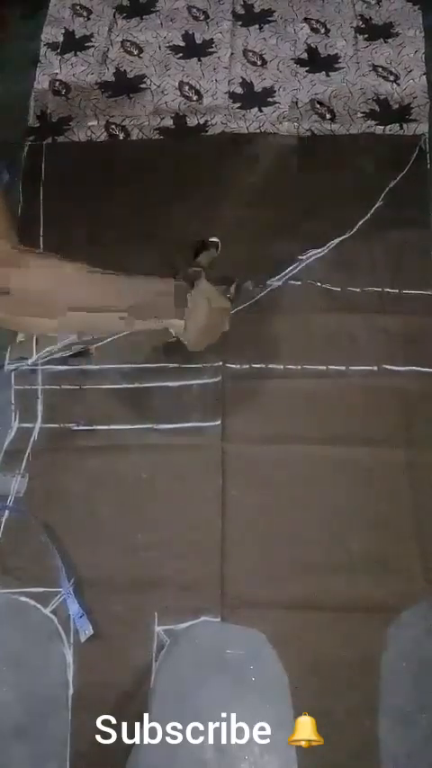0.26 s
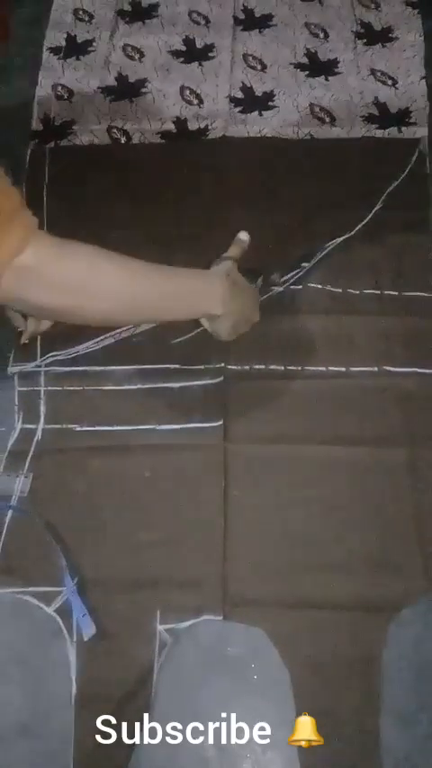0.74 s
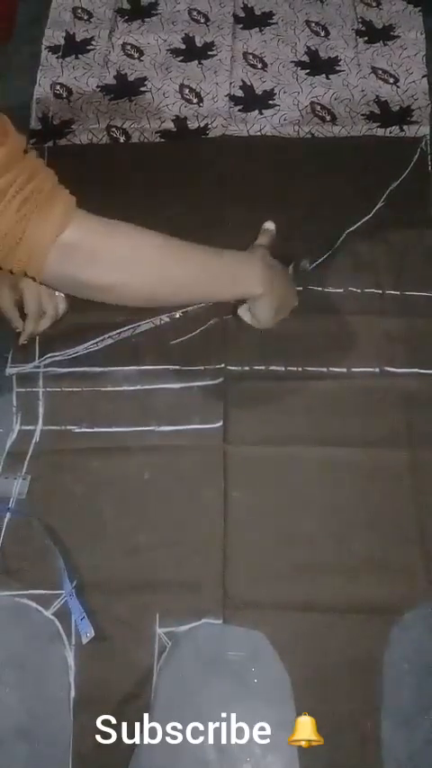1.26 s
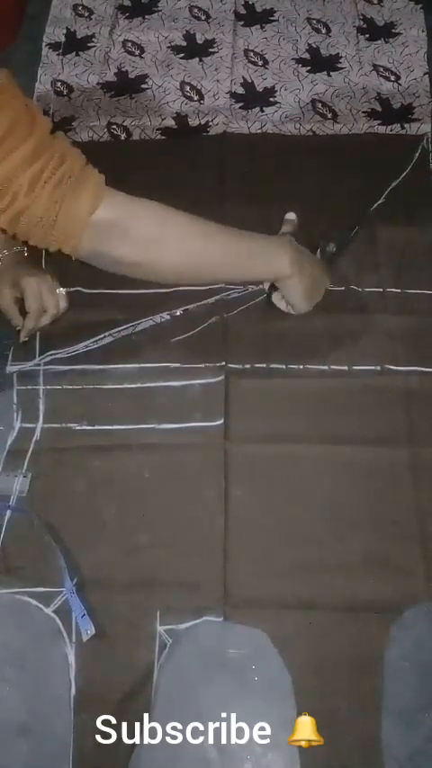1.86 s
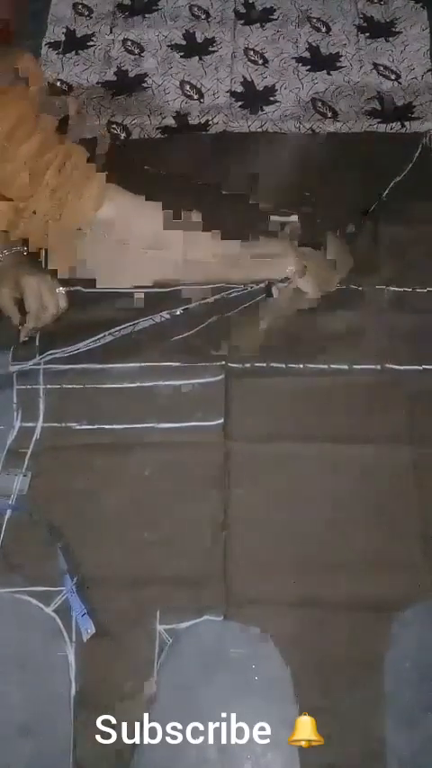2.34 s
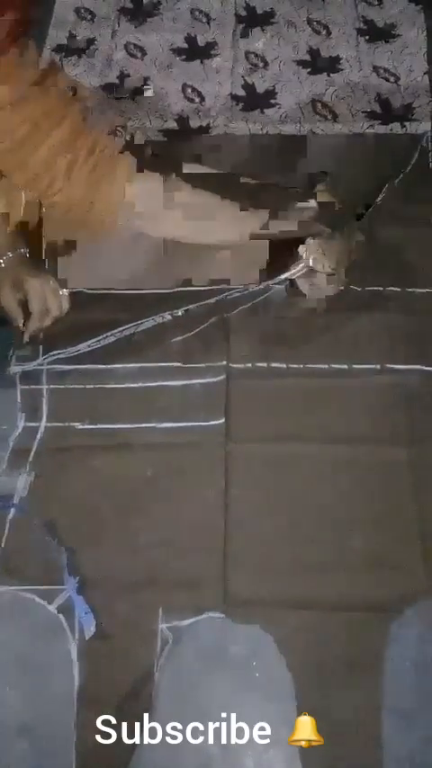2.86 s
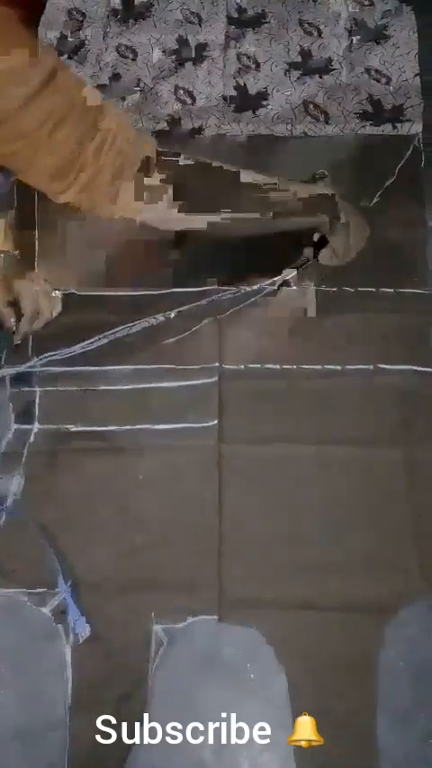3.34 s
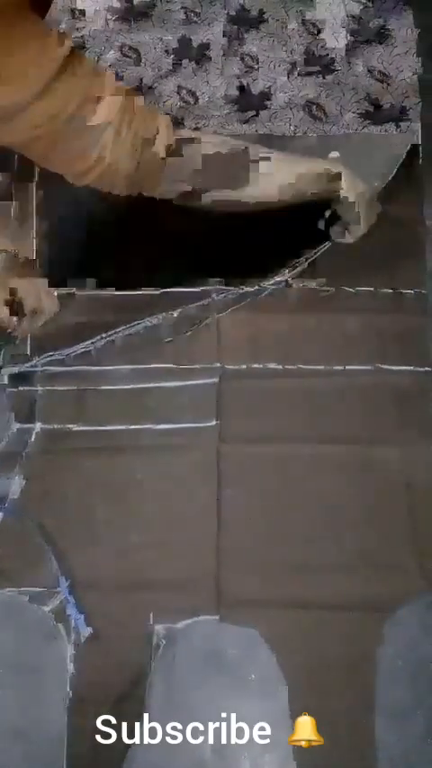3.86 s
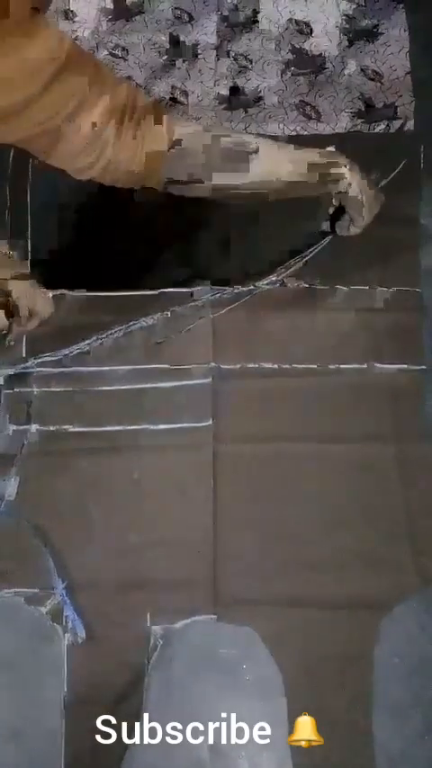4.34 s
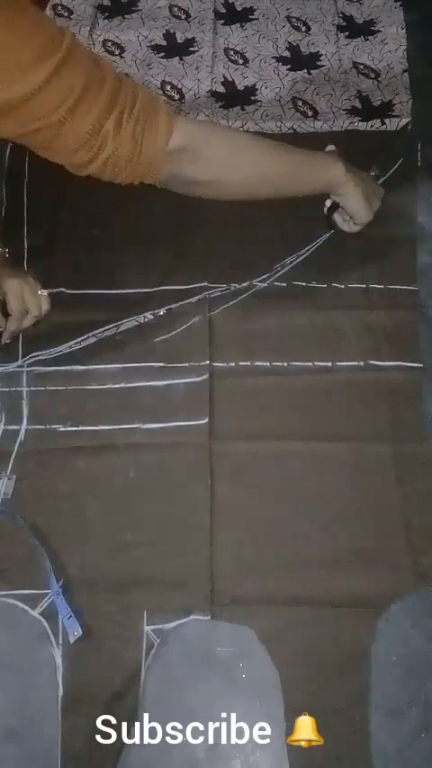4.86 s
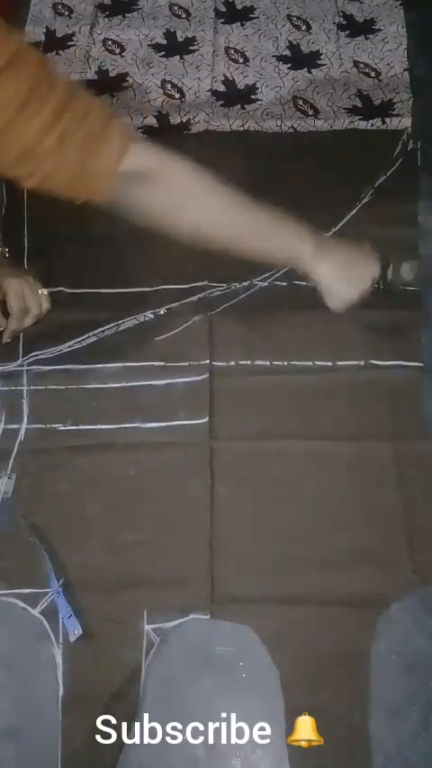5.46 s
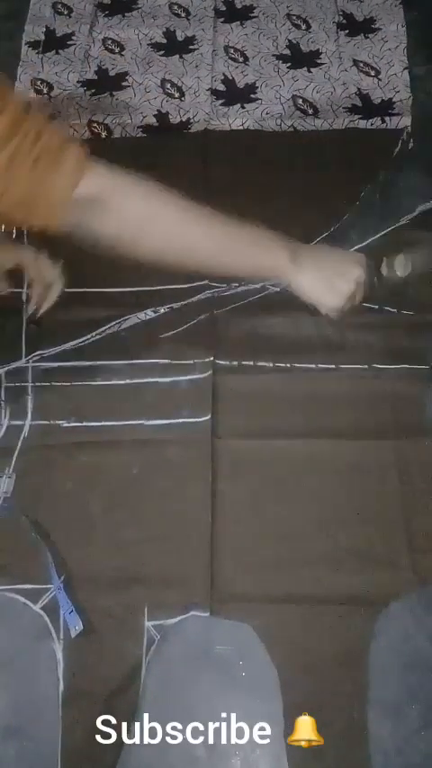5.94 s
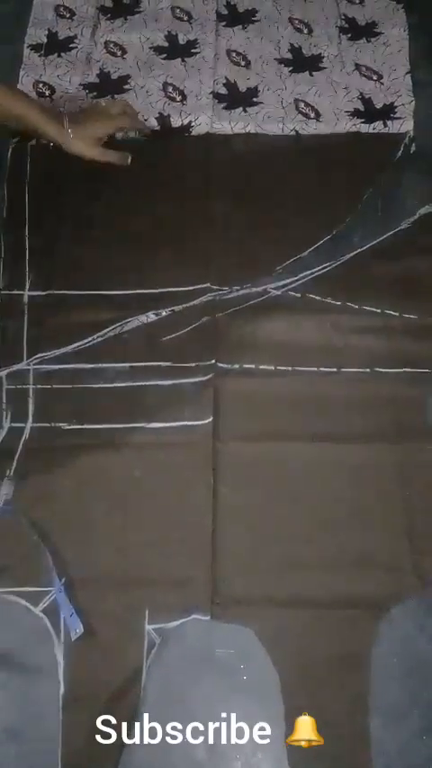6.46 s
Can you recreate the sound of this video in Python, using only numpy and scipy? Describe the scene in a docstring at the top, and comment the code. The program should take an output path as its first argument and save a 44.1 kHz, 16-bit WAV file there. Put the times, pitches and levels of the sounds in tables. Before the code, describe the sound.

Close, steady scissor strokes crunch fabric about twice a second, steel scraping between cuts, then the blades clack shut hard and brush away.

```python
"""A small room, close to the shears: a tailor cuts a curve through cloth spread on the floor, two cuts a second.
Closing, the edges crunch through threads and the lower blade drums on the floor; opening, steel rasps on steel.
These are grains of friction noise through moving resonances; ticks and the final clack are struck modes.
At the end the shears snap shut loudly and are drawn away over the cloth; air and a faint hum lie behind."""
import sys
import numpy as np
from scipy import signal
from scipy.fft import rfft, irfft, next_fast_len
from scipy.io import wavfile
from scipy.ndimage import map_coordinates

SR = 44100
rng = np.random.default_rng(int(sys.argv[2]) if len(sys.argv) > 2 else 0)


def generate_wav(signal):
    """Clip the signal to [-1, 1] and save it as 16-bit WAV at the path in sys.argv[1]."""
    frames = np.transpose(np.atleast_2d(signal))
    scaled = np.clip(frames, -1, 1) * 32767
    pcm = np.round(scaled).astype(np.int16)
    wavfile.write(sys.argv[1], SR, pcm)


N = 295026
TIME = np.arange(N) / SR

# Levels in the tables are those of each layer before the final mix.
# Closing strokes: (start [s], length [s], swell of the hiss [dB], edge hiss [dB], thread crunch [dB],
#                   floor drumming [dB], taut cloth resonance [Hz])
CLOSING_STROKES = [ (-0.1, 0.11, 5, -45, -62.5, -51, 1440), (0.349, 0.18, 12.5, -40, -56, -54.5, 1780),
                   (0.888, 0.12, 14, -40, -57.5, -51.5, 1480), (1.359, 0.11, 18, -39.5, -45.5, -47, 1380),
                   (1.926, 0.12, 18, -41, -46, -49.5, 880), (2.41, .2, 14, -41, -44.5, -48.5, 1050),
                   (2.951, 0.2, 13.5, -40.5, -46, -47, 1100), (3.545, 0.1, 14, -39, -42, -42.5, 1030),
                   (4.018, .14, 16.5, -39, -46.5, -50.5, 1490), (4.843, 0.07, 27, -54.5, -55.5, -73, 1660),
                   (5.06, 0.15, 17, -39.5, -44, -50.5, 1674), (5.854, .075, 17, -46.5, -53, -61.5, 1760), ]
# Colour of the cutting edges: (frequency [Hz], level [dB])
CUTTING_EDGE_COLOUR = [(2500, -24), (3700, -9.5), (4500, 1), (5600, 1), (7000, -2), (8050, -1.5),
                       (8600, -13), (9500, 1), (11300, -2.5), (12500, -5.5), (15500, -11.5)]
# Colour of the severed threads: (frequency [Hz], level [dB])
THREAD_COLOUR = [(350, -37), (740, -13), (970, 4), (1200, -0.5), (1550, 4.5), (2100, -2.5), (2450, -2.5),
                 (3000, 0.5), (3700, -14), (5000, -32)]
# Colour of the floor under the blade, also heard in the opening strokes: (frequency [Hz], level [dB])
FLOOR_COLOUR = [(60, -23), (150, -14), (300, -5.5), (370, -1.5), (440, 5.5), (490, -1), (545, 7.5),
                (620, -3), (750, -10.5), (1300, -51.5)]
CUT_ATTACK_S, CUT_RELEASE_DB_PER_S = 0.006, 480
CRUNCH_SWELL_DB, DRUM_SWELL_DB = 21.5, 24  # cloth and floor join in as the grip tightens
EDGE_EASE, CRUNCH_EASE, DRUM_EASE = 1.4, 1.5, 3.1  # higher = reaches full strength sooner
FLOOR_NEAR_HZ, FLOOR_FAR_HZ = 428, 570  # the floor under the blade rings higher further along


def cutting():
    """Closing: the grip tightens until the blades meet; severed threads excite the edges, cloth and floor."""
    start, length, swell_db, edge_db, crunch_db, drum_db, cloth_hz = latest(CLOSING_STROKES)
    gap = 1 - progress(start, length)
    threads = grains(rate=2200, spread_db=2.4, smooth=0.8, clump_db=1.1)

    hiss = coloured(threads, CUTTING_EDGE_COLOUR)
    hiss = shifting(hiss, depth_db=4.5, width_hz=200, life=0.07)
    crunch = coloured(threads, THREAD_COLOUR)
    crunch = shifting(crunch, depth_db=3, width_hz=150, life=0.1, size=1024)
    crunch = gliding(crunch, cloth_hz, octaves=0.181, lift_db=7.5)
    floor_hz = with_reach(FLOOR_NEAR_HZ, FLOOR_FAR_HZ)
    drum = gliding(coloured(threads, FLOOR_COLOUR), floor_hz, octaves=0.15, lift_db=10.5)

    edge_gain = amp(edge_db - swell_db * gap ** EDGE_EASE)
    crunch_gain = amp(crunch_db - CRUNCH_SWELL_DB * gap ** CRUNCH_EASE)
    drum_gain = amp(drum_db - DRUM_SWELL_DB * gap ** DRUM_EASE)
    moving = stroke(start, length, CUT_ATTACK_S, CUT_RELEASE_DB_PER_S)
    return moving * (edge_gain * hiss + crunch_gain * crunch + drum_gain * drum)


# Opening and idle strokes: (start [s], length [s], attack [s], first scrape [dB], edge hiss [dB], rasp [dB],
#   growth of rasp and drumming [dB], rasp start [Hz], rasp end [Hz], floor drumming [dB])
OPENING_STROKES = [ (0.124, 0.18, 0.031, -48, -48, -60.5, 15.5, 2354, 2300, -64),
                   (0.64, .15, 0.032, -37, -51, -54, 4, 2430, 2110, -62),
                   (1.12, 0.18, 0.031, -37, -53, -57.5, -11.5, 2626, 2200, -62.5),
                   (1.568, 0.28, 0.031, -43, -55, -51, 10, 2200, 1750, -68),
                   (2.13, 0.26, 0.049, -43.5, -52, -44, -2, 2120, 2170, -66.5),
                   (2.695, 0.17, .056, -38.5, -49, -37, -3.5, 2200, 2050, -55),
                   (3.254, 0.2, 0.029, -47, -49, -41, -1, 2394, 2140, -56.5),
                   (3.748, .175, 0.028, -42, -47.5, -44.5, 4, 1798, 1980, -57.5),
                   (4.24, 0.064, .028, -39.5, -46.5, -43, 12, 1800, 2170, -56),
                   (4.398, .062, 0.044, -60, -41, -43, 4, 1850, 1933, -77),
                   (4.632, 0.15, 0.033, -66, -70, -64, -14, 2108, 1950, -83),
                   (5.3, 0.066, 0.063, -53, -51.5, -51, 33, 2590, 2920, -63.5), ]
# Colour of the sliding edges: (frequency [Hz], level [dB])
SLIDING_EDGE_COLOUR = [(2000, -24), (3500, -0.5), (4500, 2.5), (5500, 7), (6500, 4.5), (7900, 0.5),
                       (8550, -7.5), (9200, 0.5), (10400, -0.5), (12500, -6), (15500, -22)]
# Colour of the rasp of steel on steel: (frequency [Hz], level [dB])
RASP_COLOUR = [(400, -24.5), (750, -11.5), (950, -5), (1150, -5), (1500, 1.5), (2250, -4.5), (2700, -2),
               (4000, -18), (6000, -43)]
SLIDE_RELEASE_DB_PER_S = 128.5
SLIDE_BRAKE_DB = 23.5  # the release gains this much per stroke length: quick strokes stop sooner
SCRAPE_SHARPNESS = 5.4  # the blades break free with a short bright scrape
HISS_GROWTH_DB = 0.5
SHEEN_NEAR_DB, SHEEN_FAR_DB = 2, -7.5  # top treble of the sliding steel


def sliding():
    """Opening: a bright scrape, then steel sticks and slips; the rasp glides as the crossing point moves."""
    (start, length, attack, scrape_db, edge_db, rasp_db,
     growth_db, start_hz, end_hz, drum_db) = latest(OPENING_STROKES)
    age, done = np.maximum(TIME - start, 0), progress(start, length)
    moving = stroke(start, length, attack, SLIDE_RELEASE_DB_PER_S + SLIDE_BRAKE_DB / length)
    slips = grains(rate=1700, spread_db=2.2, smooth=0.8, clump_db=1.2)

    hiss = coloured(slips, SLIDING_EDGE_COLOUR)
    hiss = shifting(hiss, depth_db=4.5, width_hz=180, life=0.06)
    sheen = amp(with_reach(SHEEN_NEAR_DB, SHEEN_FAR_DB))
    hiss = hiss + (sheen - 1) * filtered(hiss, lambda hz: hz > 8500)  # duller as the arm reaches away
    hiss_hz = falling(age, start_hz=5180, end_hz=2300, time=0.099)
    hiss = gliding(hiss, hiss_hz, octaves=0.36, lift_db=6)

    rasp = coloured(slips, RASP_COLOUR)
    rasp = shifting(rasp, depth_db=6.0, width_hz=110, life=0.085, size=1024)
    rasp = gliding(rasp, start_hz + (end_hz - start_hz) * done, octaves=0.11, lift_db=10.5)
    floor_hz = with_reach(FLOOR_NEAR_HZ, FLOOR_FAR_HZ)
    drum = gliding(coloured(slips, FLOOR_COLOUR), floor_hz, octaves=0.2, lift_db=12.0)

    scrape_shape = age / attack * np.exp(1 - age / attack)  # peaks at 1 after the attack time
    scrape_gain = amp(scrape_db) * scrape_shape ** SCRAPE_SHARPNESS
    hiss_gain = np.hypot(scrape_gain, moving * amp(edge_db + HISS_GROWTH_DB * (done + 1.5)))
    growth = amp(growth_db * (done - 0.5))
    return hiss_gain * hiss + moving * growth * (amp(rasp_db) * rasp + amp(drum_db) * drum)


def falling(age, start_hz, end_hz, time):
    """A centre frequency that drops along a bell curve as the blades part."""
    return end_hz + (start_hz - end_hz) * np.exp(-(age / time) ** 2)


# Hard-pressed blades sing: (start [s], length [s], level [dB], growth [dB])
SINGING_MOMENTS = [(3.275, 0.0062, -31.5, 1.5), (3.579, 0.059, -45, 1.5), (3.771, 0.01, -39.5, -6),
                   (4.045, 0.096, -42, 3.5), (4.249, .022, -39.5, 3.5), (4.85, 0.016, -49, 1),
                   (4.88, .026, -44.5, 9), (5.058, 0.11, -39, 6)]
# Colour of the strongest blade resonance: (frequency [Hz], level [dB])
SONG_COLOUR = [(4300, -26), (5100, -17.5), (5450, 7), (5750, 0), (6100, -9), (7000, -27)]
SONG_ATTACK_S, SONG_RELEASE_DB_PER_S = 0.011, 485


def singing():
    """Where the edges press hard on each other, friction feeds one narrow resonance."""
    start, length, db, growth_db = latest(SINGING_MOMENTS)
    moving = stroke(start, length, SONG_ATTACK_S, SONG_RELEASE_DB_PER_S)
    pressure = moving * amp(db + growth_db * (progress(start, length) - 1.5))
    friction = grains(rate=1300, spread_db=0.5, smooth=0.9, clump_db=2)
    return pressure * coloured(friction, SONG_COLOUR)


# The shears snap shut and chatter: (time [s], level [dB])
SNAP_BLOWS = [(5.4869, -0.5), (5.4906, -14), (5.4938, -18)]
# The whole shears, damped by the hand, also heard in the ticks: (frequency [Hz], level [dB], t60 [s])
FRAME_MODES = [(1340, -23.5, 0.014), (1690, -7, 0.0072), (2630, -3, 0.015), (2760, -8, .018),
               (3040, -4, 0.012), (4010, -22, 0.017), (4414, 1, 0.011), (4320, -15, 0.025),
               (6530, -16, 0.0073), (11700, -24.5, .022)]
# Colour of the clack sent to the walls, also of the dull part of a tick: (frequency [Hz], level [dB])
CLACK_COLOUR = [(120, -47.5), (200, -20), (263, -8.5), (371, -11), (1000, -14.5), (1300, -4.5), (1750, -2),
                (2300, -1.5), (3000, -1.5), (4300, -1), (5200, -4.5), (6300, -11.5), (9500, -10.5),
                (12000, -14), (15500, -28)]


def snap():
    """The handles slam and chatter: direct clack, the broader burst sent to the walls, and its spread."""
    direct, blows, spread = np.zeros((3, N))
    spread_colour = [(4200, -53.0), (4800, 3.5), (7000, 1), (15000, -21.5)]
    for s, db in SNAP_BLOWS:
        blow = ring(FRAME_MODES, scatter_db=0.5, detune=0)
        add(direct, s, amp(db) * (blow + 0.07 * crack(t60=0.025)))
        add(blows, s, amp([db + 13]))  # a single-sample impulse
        add(spread, s, amp(db - 12.5) * crack(t60=0.012, spectrum=spread_colour))
    radiated = filtered(blows, lambda hz: amp(along(CLACK_COLOUR, hz)))
    thin = signal.butter(2, 700, "high", fs=SR, output="sos")  # slim steel radiates little bass
    direct, radiated = signal.sosfilt(thin, direct), signal.sosfilt(thin, radiated)
    return direct, radiated, filtered(spread, lambda hz: hz > 4200)


# The blades catch and tick: (time [s], strike level [dB], share of the dull clack [dB])
TICK_STRIKES = [(0.1431, -35, -17), (0.3002, -32, -17), (0.6749, -25, -17), (1.1544, -25, -16),
                (1.3533, -37, -21), (1.5808, -32, -13), (1.8392, -22.5, -22), (2.2892, -33, -4),
                (2.3346, -29, -15), (2.354, -22, -17), (2.3684, -27, -11), (2.7696, -20, -10),
                (2.8524, -29, -7), (2.9756, -29, -17), (3.2784, -26, -10), (3.7728, -28, -13),
                (4.2562, -27, -13), (4.4099, -33, -5), (4.4453, -25, -7), (4.7575, -44, -15),
                (4.8329, -44, -17), (4.8574, -44, -12), (5.0654, -38, -20), (5.1916, -15, -4),
                (5.3622, -24, -8), (5.3684, -24, -8), (5.3724, -25, -8), (5.3804, -28, -13),
                (6.5345, -32, -14), (6.6563, -45, -20)]
# Ring of the blades: (frequency [Hz], level [dB], t60 [s])
BLADE_MODES = [(4300, 2.5, 0.02), (4425, -2, .03), (5505, 4.5, 0.038), (6900, -6, 0.004),
               (6730, 15, 0.0041), (8430, 0, 0.046), (8900, -16.5, .03), (11600, -10.5, 0.015),
               (11900, -11.5, 0.12), (12300, -17, .04)]


def ticks():
    """The blades catch: a gritty, bright ring over a duller knock of the whole shears."""
    out = np.zeros(N)
    for s, db, clack_db in TICK_STRIKES:
        share = min(amp(clack_db), 1)
        bright = 0.5 * ring(BLADE_MODES, scatter_db=2.5, detune=0.02) + 0.28 * crack(t60=0.02)
        dull = 0.5 * ring(FRAME_MODES, scatter_db=6.0, detune=0.11)
        dull = dull + 0.22 * crack(t60=0.016, spectrum=CLACK_COLOUR)
        bite = 1 - np.exp(-np.arange(len(dull)) / SR / 0.001)  # the edges dig in over a millisecond
        strike = np.sqrt(1 - share ** 2 / 2) * bright + share * dull
        add(out, s - 0.0005, amp(db + 3.5) * bite * strike)
    return out


# Soft bumps on the floor: (time [s], level [dB], pitch [Hz])
FLOOR_BUMPS = [(2.595, -52, 70), (2.854, -43.5, 467), (4.476, -59.5, 485), (5.794, -53, 753),
               (5.817, -50, 220), (5.878, -53.5, 693), (6.539, -54, 75)]


def bumps():
    """Padded knocks of hand and shears on the floor: decaying noise banded around a pitch."""
    out = np.zeros(N)
    for s, db, hz in FLOOR_BUMPS:
        colour = [(hz / 4, -25), (hz / 2.06, 0), (hz * 1.3, 0), (hz * 3, -30), (hz * 10, -70)]
        add(out, s, amp(db - 0.5) * crack(t60=0.17, spectrum=colour))
    return out


# The arm drags over the cloth: (middle [s], half length [s], level [dB])
ARM_DRAGS = [(2.57, 0.087, -62), (3.12, 0.4, -58.5)]
# Colour of the sleeve on the cloth: (frequency [Hz], level [dB])
SLEEVE_COLOUR = [(60, -17), (150, -2.5), (250, -8), (340, 2), (450, -27), (900, -27.5)]
# The shears sweep away over the cloth: (middle [s], half length [s], level [dB])
SHEAR_SWEEPS = [(6.46, 0.15, -64)]
# Colour of the shears on the cloth: (frequency [Hz], level [dB])
CLOTH_COLOUR = [(290, -47.5), (500, -25), (674, 0.5), (949, -22), (1880, -10), (3880, -6), (5700, -5),
                (6030, -16), (15000, -39)]


def brushing():
    """Friction noise swells as the arm drags over the cloth and, at the end, the shears sweep across it."""
    out = 0
    for rows, colour in (ARM_DRAGS, SLEEVE_COLOUR), (SHEAR_SWEEPS, CLOTH_COLOUR):
        level = sum(amp(db) * swell(middle, half_length) for middle, half_length, db in rows)
        out = out + level * coloured(rng.standard_normal(N), colour)
    return out


# The room's decay: (frequency [Hz], t60 [s])
ROOM_DECAY = [(200, .3), (1500, .255), (4500, .25), (9000, .215), (15000, .17)]


def room(x, build):
    """Dense wall echoes that build up and die, the treble first."""
    hz, t, z = signal.stft(rng.standard_normal(SR // 2), SR, nperseg=256)
    decay = amp(-60 * t / along(ROOM_DECAY, hz)[:, None])
    onset = 1 - np.exp(-(t / build) ** 2)
    tail = signal.istft(z * decay * onset, SR, nperseg=256)[1]
    return signal.fftconvolve(x, tail / np.linalg.norm(tail))[:N]


# A faint hum swells and fades:
# (centre frequency [Hz], steady level [dB], middle of the swell [s], half length [s], swell level [dB])
HUM_TONES = [(105.5, -78, .9, 0.88, -63), (417, -83, 1.33, 0.69, -60)]
# Colour of the room air: (frequency [Hz], level [dB])
AIR_COLOUR = [(15, -35.5), (25, -16), (69, 6), (140, 2.5), (209, -5), (421, -10), (457, -6.5), (631, -14.5),
              (1570, -20), (3300, -22.5), (4200, -18.5), (5700, -22), (7100, -24), (15500, -22)]
AIR_DB = -65.5
HUM_WAVER_DB = 3  # the hum wavers in level


def background():
    """Still room air as coloured noise, and a hum of sines slightly wavering in pitch and level."""
    hum = 0
    for hz, steady_db, middle, half_length, swell_db in HUM_TONES:
        level = amp(steady_db) + amp(swell_db) * swell(middle, half_length)
        phase = 2 * np.pi * np.cumsum(hz + 1.5 * wobble(11)) / SR
        hum = hum + level * np.sin(phase)
    air = amp(AIR_DB) * coloured(rng.standard_normal(N), AIR_COLOUR)
    return amp(HUM_WAVER_DB * wobble(5.8)) * hum + air


def grains(rate, spread_db, smooth, clump_db):
    """Tiny uneven snaps on a share of smooth friction noise, bunched as the blade grips and slips."""
    happens = rng.random(N) < rate / SR
    size = amp(spread_db * np.clip(rng.standard_normal(N), -2, 2))
    snaps = happens * size * rng.choice([-1, 1], N)
    friction = unit(snaps) + smooth * rng.standard_normal(N)
    return unit(friction * amp(clump_db * wobble(130)))


def shifting(x, depth_db, width_hz, life, size=512):
    """The contact point travels along the blades, so narrow resonances come and go."""
    hz, t, z = signal.stft(x, SR, nperseg=size)
    places = np.meshgrid(hz / width_hz, t / life, indexing="ij")
    field = map_coordinates(rng.standard_normal((400, 400)), places, mode="mirror")
    return unit(signal.istft(z * amp(depth_db * field), SR, nperseg=size)[1][:N])


def gliding(x, centre_hz, octaves, lift_db):
    """A resonance that follows a centre frequency, at constant loudness."""
    hz, t, z = signal.stft(x, SR, nperseg=512)
    offset = np.log2((hz[:, None] + 1) / np.interp(t, TIME, centre_hz))
    gain = amp(lift_db / (1 + (offset / octaves) ** 2))
    power = np.mean(abs(z) ** 2, axis=1)
    level = np.sqrt(power @ gain ** 2)
    return unit(signal.istft(z * gain / level, SR, nperseg=512)[1][:N])


def ring(modes, scatter_db, detune):
    """One blow on a set of modes; grip and contact point vary strengths and pitches a little. Peak 1."""
    t = np.arange(SR // 4) / SR
    wave = 0
    for k, (hz, db, t60) in enumerate(modes):
        louder, sharper = rng.standard_normal(2)
        decay = amp(db + scatter_db * louder - 60 * t / t60)
        tone = np.sin(2 * np.pi * hz * (1 + detune * sharper) * t)
        wave = wave + (-1) ** k * decay * tone
    return wave / abs(wave).max()


# Colour of steel meeting steel: (frequency [Hz], level [dB])
CONTACT_COLOUR = [(300, -21), (1200, -16), (2500, -3), (5500, 5.5), (10000, -2.5), (15500, -15)]


def crack(t60, spectrum=CONTACT_COLOUR):
    """A short decaying burst of coloured contact noise."""
    t = np.arange(SR // 4) / SR
    response = amp(along(spectrum, np.fft.rfftfreq(len(t), 1 / SR)))
    noise = irfft(rfft(rng.standard_normal(len(t))) * response, len(t))
    return amp(-60 * t / t60) * unit(noise)


def latest(rows):
    """For each sample, the columns of the stroke that started last."""
    rows = np.array(rows)
    return rows[np.maximum(np.searchsorted(rows[:, 0], TIME) - 1, 0)].T


def progress(start, length):
    """Share of a stroke that is done, 0 to 1."""
    return np.clip((TIME - start) / length, 0, 1)


def stroke(start, length, attack, release_db_per_s):
    """Gain of one movement: a ramp up, a hold, a steady fall in dB."""
    overtime = np.maximum(TIME - start - length, 0)
    return progress(start, attack) * amp(-abs(release_db_per_s) * overtime)


def swell(middle, half_length):
    """Gain of a smooth rise and fall."""
    return np.exp(-((TIME - middle) / half_length) ** 2)


# How far the arm has reached along the cut: (time [s], share [0-1])
ARM_REACH = [(1.2, 0), (2.1, 0.12), (3.1, 0.43), (4.15, 1), (5.3, 1)]


def with_reach(near, far):
    """A quantity that changes as the arm reaches along the cut."""
    s, share = np.transpose(ARM_REACH)
    return near + (far - near) * np.interp(TIME, s, share)


def wobble(rate):
    """A smooth random curve, rate knots a second."""
    return map_coordinates(rng.standard_normal(8192), [TIME * rate], mode="mirror")


def amp(db):
    """Decibels to gain."""
    return np.exp(np.asarray(db) * (np.log(10) / 20))


def unit(x):
    """Scale to rms 1."""
    return x / np.sqrt(np.mean(x ** 2) + 1e-20)


def along(points, hz):
    """Read (frequency [Hz], value) points on a log axis."""
    f, v = np.transpose(points)
    return np.interp(np.log(hz + 1), np.log(f), v)


def filtered(x, response):
    """x times a response of frequency."""
    size = next_fast_len(N + SR // 2)
    return irfft(rfft(x, size) * response(np.fft.rfftfreq(size, 1 / SR)), size)[..., :N]


def coloured(x, spectrum):
    """x with a (frequency [Hz], level [dB]) colour, at rms 1."""
    return unit(filtered(x, lambda hz: amp(along(spectrum, hz))))


def add(track, s, sound):
    """Mix a sound into a track at time s."""
    part = track[round(s * SR):][:len(sound)]
    part += sound[:len(part)]


GRIP_WAVER_DB, GRIP_WAVERS_PER_S = 1.42, 35  # the hand never presses evenly


def scene():
    """Everything sits in the middle; only the treble of the loud clack spreads out."""
    grip = amp(GRIP_WAVER_DB * wobble(GRIP_WAVERS_PER_S))
    blades = (cutting() + sliding() + singing()) * grip
    knocks = ticks() + bumps()
    clack, radiated, spread = snap()
    mid = amp(-2) * blades + amp(-11.0) * room(blades, build=0.0033)
    mid += knocks + amp(-12.0) * room(knocks, build=0.002)
    mid += clack + room(radiated, build=0.0055)
    mid += brushing() + background()
    return np.array([mid + spread, mid - spread])  # opposite polarity left and right


TOP_HZ = 15850


def record(dry):
    """The phone's microphone clips at full scale, and nothing above the band limit is kept."""
    return filtered(np.clip(dry, -1, 1), lambda hz: hz < TOP_HZ)


dry = scene()
out = record(dry)
generate_wav(out)
```